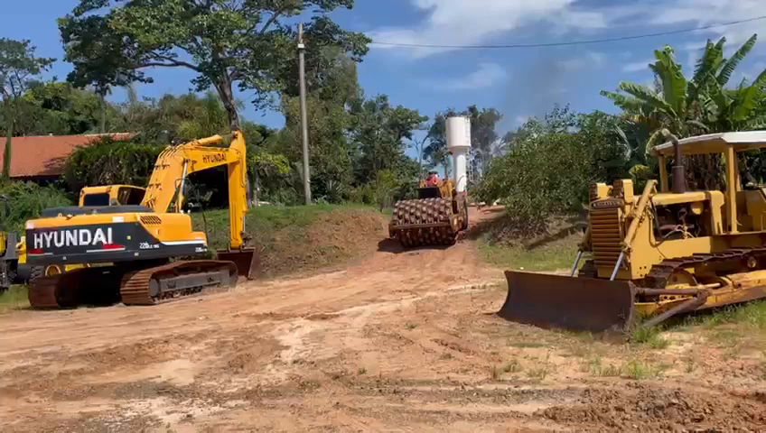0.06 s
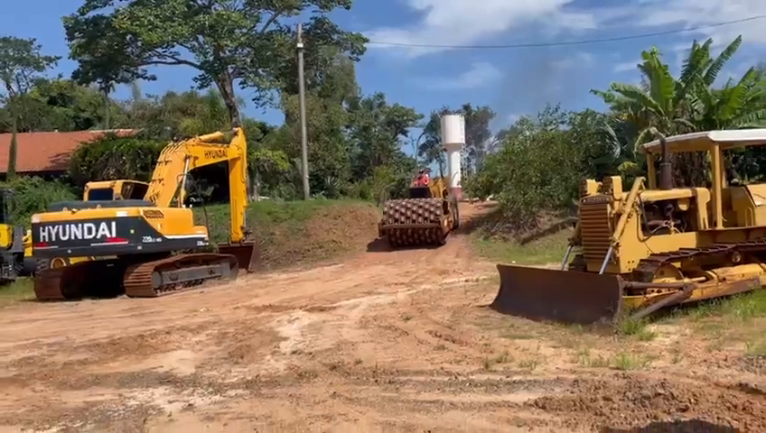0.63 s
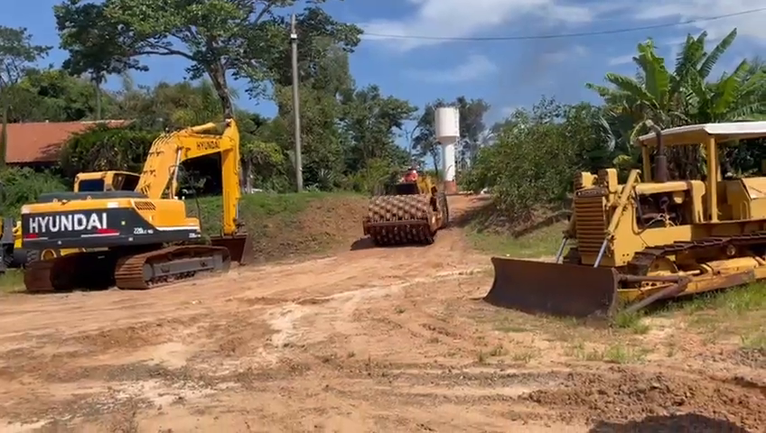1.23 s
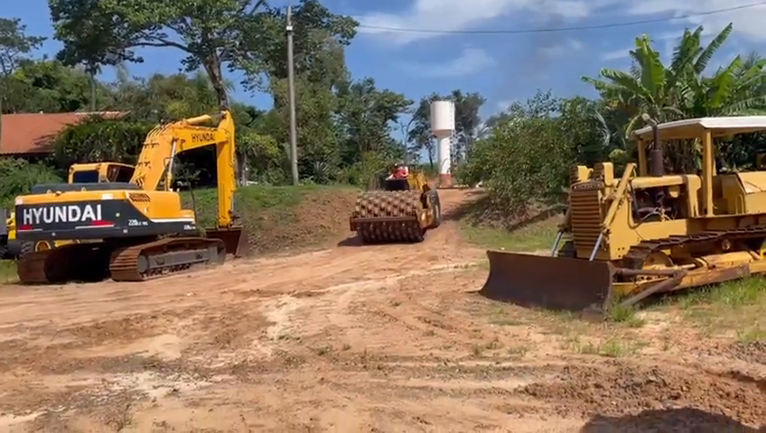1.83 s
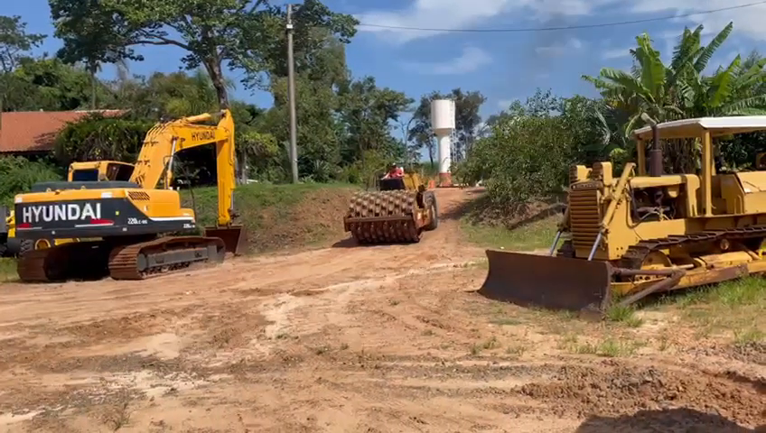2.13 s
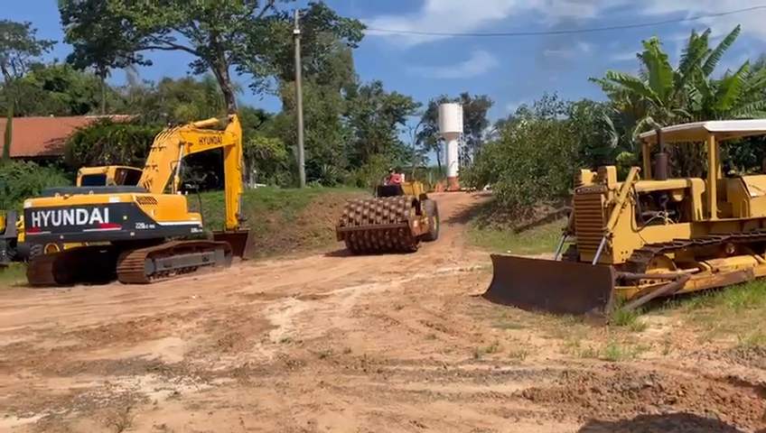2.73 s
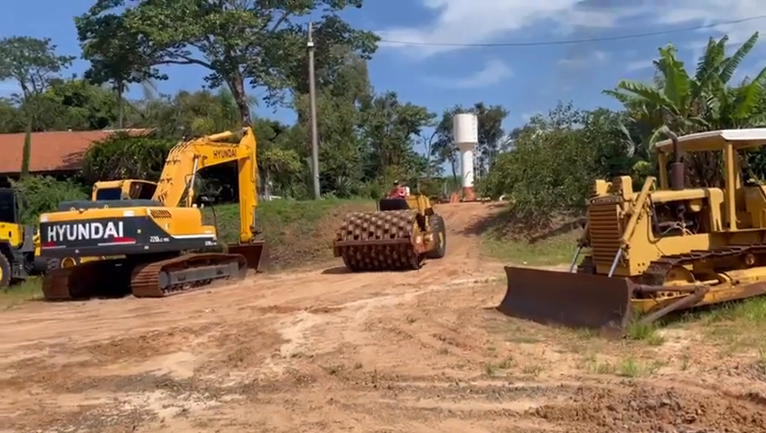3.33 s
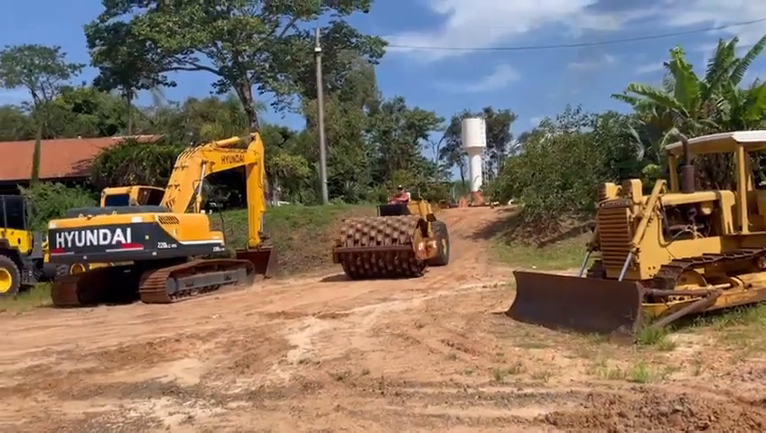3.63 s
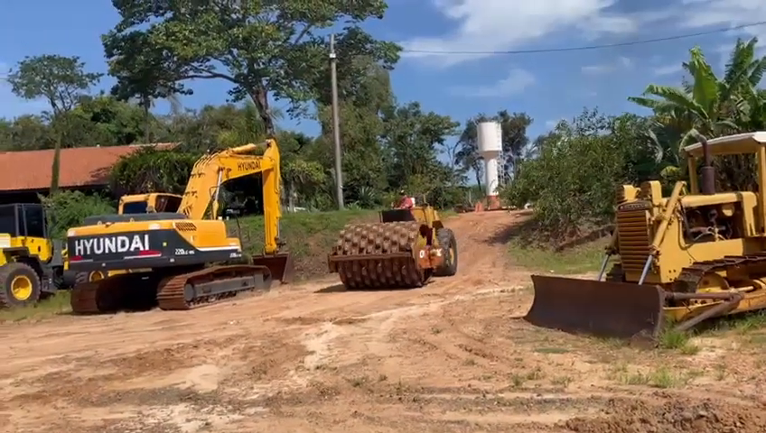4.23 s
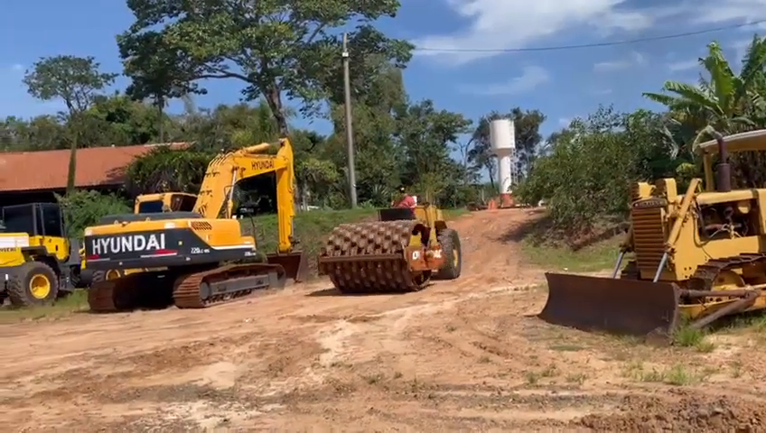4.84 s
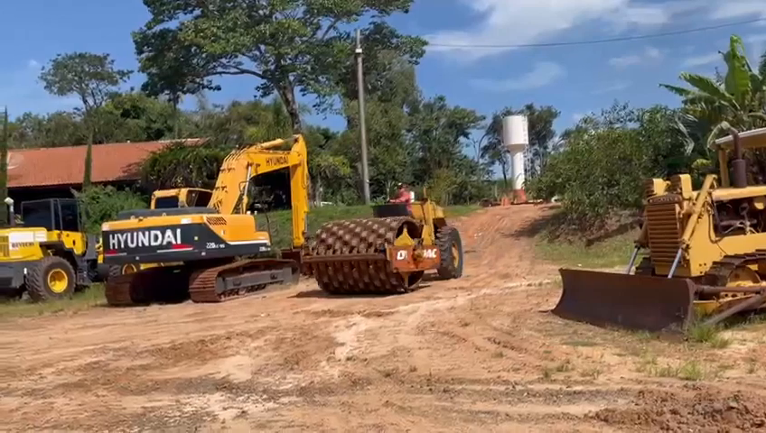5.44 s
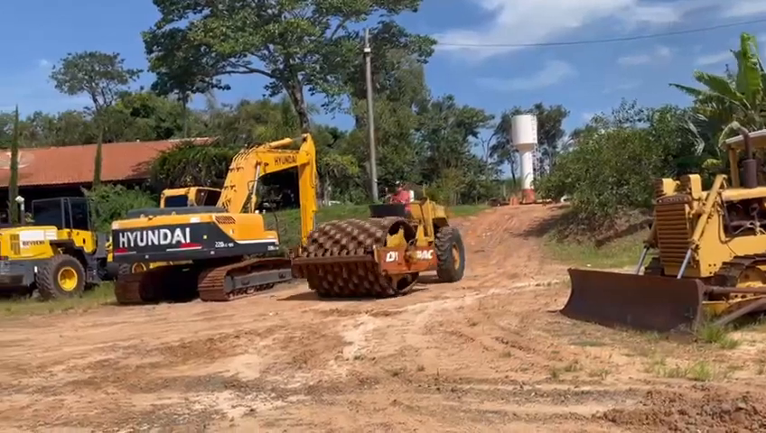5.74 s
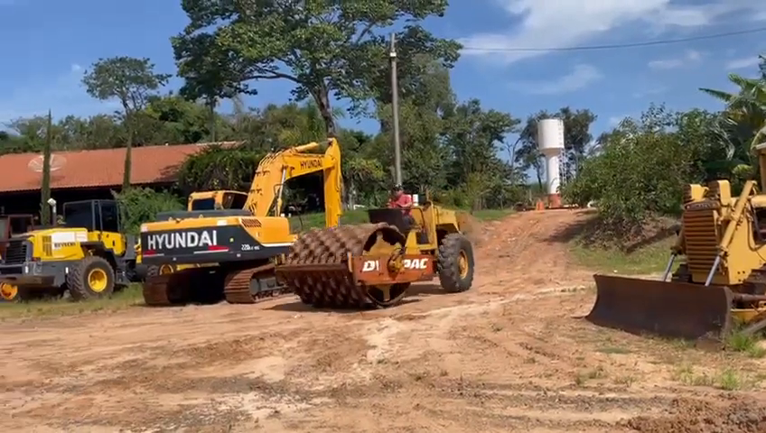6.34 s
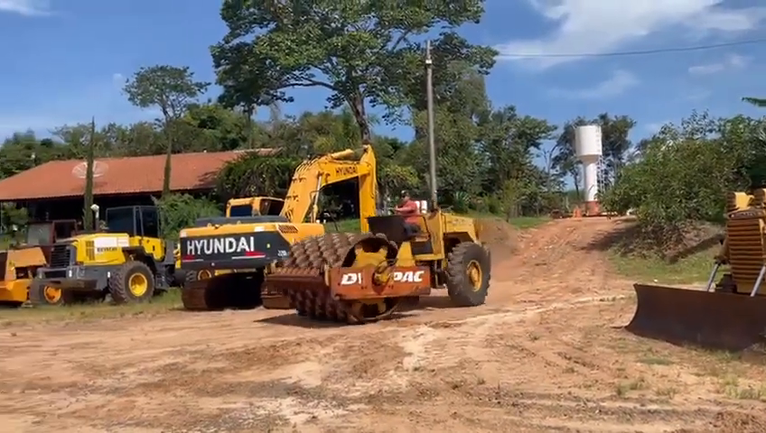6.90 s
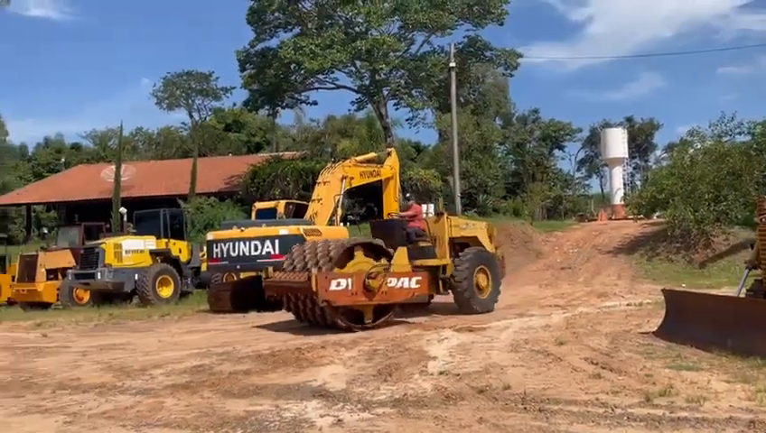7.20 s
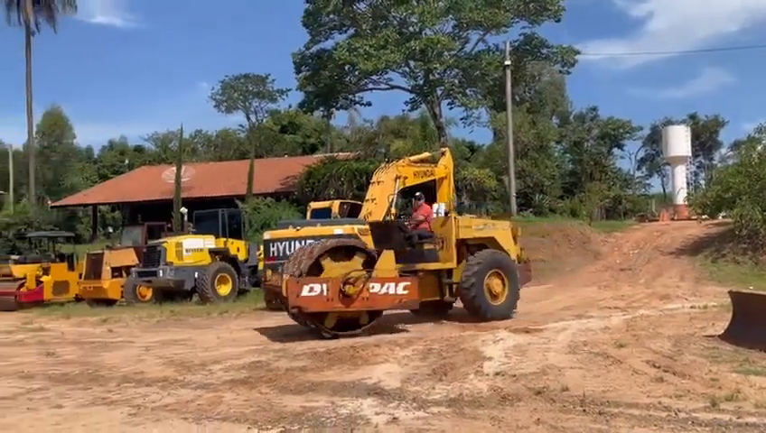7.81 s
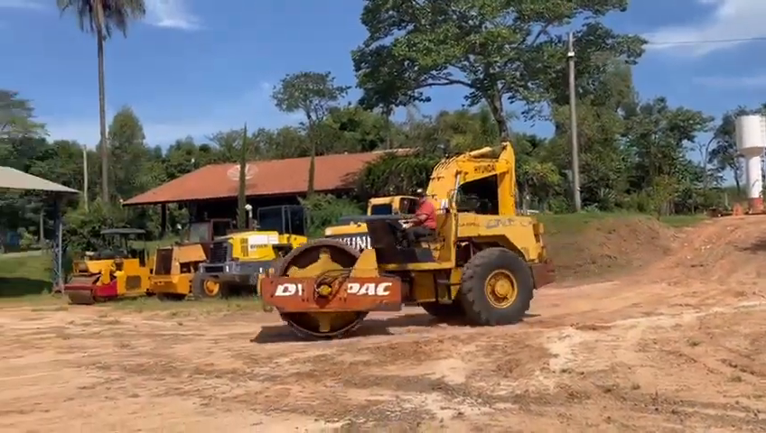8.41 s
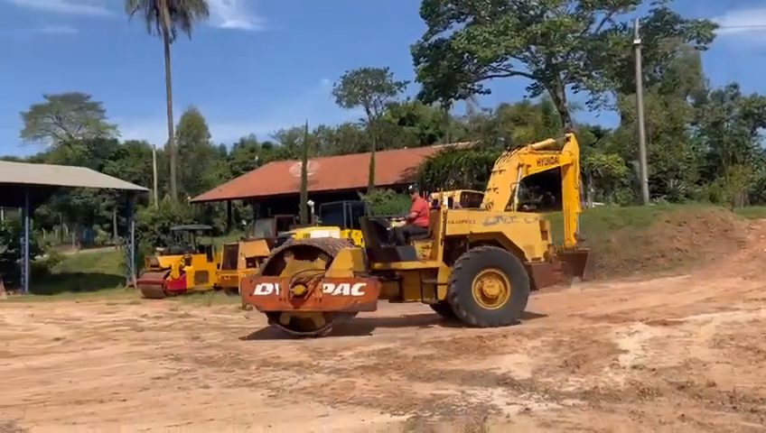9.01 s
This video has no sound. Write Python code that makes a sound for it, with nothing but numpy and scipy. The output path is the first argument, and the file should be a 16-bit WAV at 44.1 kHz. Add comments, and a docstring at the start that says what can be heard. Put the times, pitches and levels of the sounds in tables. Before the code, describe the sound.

The booming diesel engine of a road roller draws nearer outdoors, knocking and ticking while its drum rattles and groans.

```python
"""A six-cylinder diesel road roller, heard from a stereo microphone in an open yard, about 23 m off to 7 m.
It drives down a dirt ramp and across the yard. The exhaust booms at the firing rate and uneven cylinders
make it lope; the block knocks, and the injectors clatter and ring the covers. The padfoot drum crunches
over the crest and groans, its scraper plates rattle and loose steel clanks.
Parked machines and trees scatter the sound back from the sides."""
import sys
import numpy as np
from scipy import signal
from scipy.fft import rfft, irfft, next_fast_len
from scipy.io import wavfile
from scipy.ndimage import uniform_filter1d, map_coordinates

SR = 44100
rng = np.random.default_rng(int(sys.argv[2]) if len(sys.argv) > 2 else 0)


def int16_out(signal):
    """Quantize to a 16-bit WAV file."""
    q = np.round(np.clip(np.atleast_2d(signal).T, -1, 1) * 32767)
    wavfile.write(sys.argv[1], SR, q.astype(np.int16))


N = 399546
TIME = np.arange(N) / SR
CYLINDERS = 6

# exhaust note at the microphone: time_s, level_db
EXHAUST_LEVEL = [(0.0, -12), (0.05, -11), (0.91, -12), (2.85, -8.5), (3.5, -10), (4.14, -7.5), (4.97, -10),
                 (6.56, -7.5), (8.15, -8), (8.93, -12), (9.01, -11.5), (9.06, -12.5)]
# unevenness of the firings: time_s, depth_per_cycle, depth_per_crank_turn (both 0-1)
EXHAUST_LOPE = [(0, 0.13, 0.12), (1.1, 0.2, 0.13), (1.6, 0.04, 0.06), (7, 0, 0.02), (8.4, 0, 0.1),
                (9.06, 0.05, 0.55)]
def exhaust(firing, in_yard):
    """The pipe rounds the firing pulses to a deep note and its octave; uneven cylinders make it throb."""
    note_db, = curves(EXHAUST_LEVEL)
    per_cycle, per_turn = curves(EXHAUST_LOPE)
    cycle_angle = 2 * np.pi * firing / CYLINDERS
    lope = 1 + per_cycle * np.cos(cycle_angle) + per_turn * np.cos(2 * cycle_angle)
    angle = 2 * np.pi * firing + 0.012 * np.sin(2 * cycle_angle)  # the crank hurries and lags each turn
    note = undb(note_db + 0.15 * walk(12)) * np.cos(angle)
    # the octave is stronger side-on, in the yard; it swells and sinks every 1.06 s
    octave_db = blend((-33, -19.5), in_yard) - 1.1 * np.cos(2 * np.pi * (TIME - 6.87) / 1.06)
    octave = undb(octave_db + 0.37 * walk(9)) * np.cos(2 * angle + np.pi / 3 + 0.042 * walk(15))
    return np.sqrt(2) * lope * (note + octave)


# exhaust lines, relative to the rumble: multiple_of_cycle, ramp_db, yard_db
EXHAUST_LINES = [(3, -16, -32), (5, -12, -36), (7, -24, -20), (8, -14, -16.5), (9, -11, -15.5),
                 (10, -7.5, -10), (11, -19.5, -14.5), (14, -16, -11), (15, -25, -12.5), (16, -22.5, -17),
                 (18, -11.5, -14.5), (20, -26, -18), (21, -18.5, -18), (22, -21, -22), (24, -27.5, -16.5),
                 (26, -33, -22.5), (28, -34, -21), (31, -29, -27), (35, -34, -19.5), (36, -28, -25.5),
                 (39, -33.5, -25), (42, -35.5, -24)]
# lines of the belt-driven fan, likewise: multiple_of_cycle, ramp_db, yard_db
FAN_LINES = [(20.34, -19.5, -16.5), (36.65, -36, -25)]
# spectrum of the exhaust gas: frequency_hz, gain_db
GAS_SPECTRUM = [(20, -13.5), (36, -15.5), (50, -1.5), (75, -2.5), (100, -6.5), (150, -4), (200, -4.5),
                (260, -8.5), (330, -7), (420, -12.5), (600, -21.5), (1200, -52.5)]
def rumble(cycle, in_yard):
    """Exhaust and fan lines hum in turbulent gas; their balance shifts as the roller turns side-on."""
    lines = 0
    for order, *levels_db in EXHAUST_LINES + FAN_LINES:
        angle = 2 * np.pi * (order * cycle + rng.random()) + 0.31 * walk(6)
        lines += undb(blend(levels_db, in_yard)) * np.cos(angle)
    gas = unit(colour(rng.standard_normal(N), GAS_SPECTRUM))
    return np.sqrt(2) * lines + undb(-3.5) * gas


# the block heard far off, on the ramp: frequency_hz, gain_db
KNOCK_ON_RAMP = [(250, -28), (480, 0), (620, -1.5), (780, -2), (950, -2), (1200, -6), (1500, -4.5),
                 (1850, -11.5), (2080, -7), (2600, -13.5), (5000, -54.5)]
# the block heard closer, in the yard: frequency_hz, gain_db
KNOCK_IN_YARD = [(250, -8.5), (450, 0.5), (600, 1.5), (720, -1.5), (850, -3.5), (1050, -3), (1300, -2.5),
                 (1600, -4.5), (1900, -7), (2600, -15.5), (5000, -51)]
# its side panels: pitch_hz, width_hz, lift_db
PANEL_RESONANCES = [(597, 70, 4), (796, 60, 5), (908, 90, 6), (1180, 45, 6), (1313, 48, 4.5)]
def block_knock(firing, in_yard):
    """Combustion knocks the block; its side panels face the microphone once it is in the yard."""
    impacts = cycle_noise(firing, repeat=0.25)
    impacts *= blows(firing, [0, -2.5, 1.6, 2, -6, -0.5], decay_firings=0.82, scatter_db=1.7, floor=2)
    far = unit(colour(impacts, KNOCK_ON_RAMP))
    near = unit(colour(impacts, KNOCK_IN_YARD, PANEL_RESONANCES))
    return blend((far, near), in_yard)


# spectrum of the valve clatter: frequency_hz, gain_db
VALVE_SPECTRUM = [(1000, -17.5), (1700, 1), (1900, -3.5), (2100, 1.5), (2650, 1), (3100, 0.5), (3450, 1.5),
                  (4050, -1), (4500, -4), (6000, -15.5), (9000, -52.5)]
# the covers it passes through: pitch_hz, width_hz, lift_db
COVER_RESONANCES = [(2640, 280, 2.1), (3980, 210, 1.3)]
def valve_clatter(firing):
    """The valves rattle the covers, out of step with the firings."""
    cylinder_db = [2.5, -10, -8.5, -1, -1, -1.5]
    strikes = blows(firing + 5.19, cylinder_db, decay_firings=0.99, scatter_db=1.5, floor=0.56)
    clatter = cycle_noise(firing, repeat=0.33) * strikes * undb(0.5 * walk(14))
    return unit(colour(clatter, VALVE_SPECTRUM, COVER_RESONANCES))


# each cylinder's injector tick: relative_db
TICK_DB = [-1.5, 2.5, -1, -0.5, -5, -1.5]
# spectrum of the ticks: frequency_hz, gain_db
INJECTOR_SPECTRUM = [(2500, -23), (4000, 1.5), (4600, 2), (5400, 3.5), (6200, 0), (7000, 0), (8200, -2.5),
                     (9300, -3), (10000, -11.5), (11400, -9), (12500, -45)]
def injector_hiss(firing):
    """The injector ticks run together into a pulsing hiss; one cylinder is louder than the rest."""
    ticks = blows(firing, TICK_DB, decay_firings=1, scatter_db=1.8, floor=0.85)
    hiss = cycle_noise(firing, repeat=0.092) * ticks * undb(1.1 * walk(13))
    return unit(colour(hiss, INJECTOR_SPECTRUM))


# engine covers that face the yard: pitch_hz, relative_db
COVER_NOTES = [(1650, -5), (2350, -2), (3100, -5.5), (3550, -1.5), (4020, 3), (5350, -15), (5900, 1),
               (6450, -3), (7400, -2), (8600, -12), (10500, -13.5)]
def cover_ring(firing):
    """Each injection rings the sheet-metal covers, at a slightly different pitch and strength each time."""
    starts = np.flatnonzero(np.diff(np.floor(firing))) + 1
    tick_db = np.array(TICK_DB)[firing[starts].astype(int) % CYLINDERS]
    out = 0
    for hz, db in COVER_NOTES:
        stray, force, late = rng.standard_normal((len(starts), 3)).T
        starts_s = starts / SR + 0.002 * abs(late)
        out += pings(starts_s, hz * (1 + 0.0407 * stray), db + tick_db + 5.5 * np.tanh(force), t60_s=0.064)
    return unit(out)


# scraper plates: pitch_hz, relative_db on the ramp, relative_db from its foot on
PLATE_NOTES = [(1797, -12.5, -7.5), (2077, -2.5, -7.5), (2192, -1, -9), (2283, -10.5, 1), (2457, -13.5, -1),
               (2890, 0.5, -2), (3045, -3.5, 2), (3150, -6.5, -7), (3306, -5, -2.5), (3464, -6.5, -2.5),
               (3766, -2, -4), (4980, -4.5, -10)]
# their rattle at the microphone: time_s, level_db
PLATE_LEVEL = [(0, -54), (2.0, -42.5), (2.7, -35), (3.75, -33), (4.1, -29), (4.75, -29.5), (5.4, -35.5),
               (6.3, -36.5), (7.3, -34), (8.3, -34.5), (8.75, -31), (9.06, -32.5)]
def plate_rattle(strikes_per_s=54):
    """Scraper plates clink against the drum; different ones stand out from the foot of the ramp on."""
    level_db, = curves(PLATE_LEVEL)
    past_foot = passage(middle_s=3.9, length_s=0.33)
    count = int(strikes_per_s * N / SR)
    out = 0
    for hz, *levels_db in PLATE_NOTES:
        moment, force = rng.random((count, 2)).T
        starts_s = (np.arange(count) + moment) / strikes_per_s
        pitch_hz = hz * (1 + 0.0055 * rng.standard_normal(count))
        strikes = pings(starts_s, pitch_hz, db=11 * force, t60_s=0.075)
        out += undb(blend(levels_db, past_foot)) * unit(strikes)
    return undb(level_db) * unit(out)


# modes of the loose steel: pitch_hz, relative_db, t60_s
STEEL_MODES = [(2370, -6.5, 0.081), (3680, -6.5, .07), (3996, -7.5, 0.074), (4290, -10, 0.04),
               (5070, -6, 0.041), (5370, -11.5, 0.054), (5850, -13, 0.07), (6940, -3.5, 0.027)]
def steel_clink(t, favoured_hz, lift_db=12, width_hz=190):
    """One blow on loose steel: a crack and a ring, lifted near the pitch that the struck spot favours."""
    modes = [(hz, db + lift_db * np.exp(-((hz - favoured_hz) / width_hz) ** 2), t60_s)
             for hz, db, t60_s in STEEL_MODES]
    crack = signal.lfilter(*signal.butter(2, 7000, fs=SR), rng.standard_normal(len(t)))
    crack *= np.exp(-t / 0.011) + 0.36 * np.exp(-t / 0.082)
    attack = 1 - np.exp(-t / 0.00038)
    return attack * (undb(-4) * ring(modes, t, detune=0.0094) + undb(-2) * crack)


# modes of the drum's shell: pitch_hz, relative_db, t60_s
SHELL_MODES = [(511, 4.5, 0.25), (620, -7, 0.2), (790, -3, 0.25)]
# blows on the drum: start_s, steel_gain_db, shell_gain_db, favoured_hz
STEEL_BLOWS = [(0.054, -34.5, -54, 3910), (0.168, -32.5, -58, 3600), (0.256, -33, -55, 3790),
               (0.326, -28.5, -54, 3880), (0.422, -30, -55, 4300), (0.534, -35, -55, 4900),
               (1.057, -31.5, -35, 5370), (1.332, -31, -40, 4120), (1.449, -17, -27.5, 3920),
               (1.470, -27.5, -27.5, 2400), (1.493, -35, -28.5, 3700), (1.819, -30, -55, 3400),
               (2.853, -24.5, -38, 5300), (3.22, -24, -37, 5070), (3.278, -21, -33, 3680),
               (3.340, -18.5, -36, 5330), (3.373, -24.5, -50, 3780), (3.64, -38, -45, 3000),
               (4.308, -22, -48, 3800)]
def steel_clanks(firing):
    """Loose steel strikes the drum and rings its shell; on the ramp the engine shakes it into taps."""
    out = np.zeros(N + SR)
    t = np.arange(SR // 2) / SR
    for start_s, steel_db, shell_db, favoured_hz in STEEL_BLOWS:
        start = int(start_s * SR)
        steel = undb(steel_db) * steel_clink(t, favoured_hz)
        shell = undb(shell_db) * ring(SHELL_MODES, t, detune=0.0027)
        out[start:start + len(t)] += steel + shell
    tap_t = t[:SR // 8]
    for start in np.flatnonzero(np.diff((firing - 0.7) // CYLINDERS)):  # once an engine cycle
        if 2.75 < start / SR < 4.1:
            strength = undb(-28 + 1.2 * rng.standard_normal())
            out[start:start + len(tap_t)] += strength * steel_clink(tap_t, favoured_hz=6780)
    return out[:N]


# grit crushed under the drum: frequency_hz, gain_db
GRIT_SPECTRUM = [(200, -11), (500, 12), (900, -4), (2000, -6), (4000, -7.5), (6300, -2.5), (7500, -5),
                 (12000, -25)]
def grit_crunch(start_s=2.26, attack_s=0.055, fade_after_s=0.15, release_s=0.11, grains_per_s=6200):
    """The drum bites into grit as it tips over the crest: a surge of tiny impacts that dies away."""
    age = TIME - start_s
    swell = np.clip(age / attack_s, 0, 1) * np.exp(-np.maximum(age - fade_after_s, 0) / release_s)
    level_db = -29.5 + 2.1 * walk(60)
    grains = (rng.random(N) < grains_per_s / SR) * np.sign(rng.standard_normal(N))
    grains *= undb(12 * rng.random(N))
    return swell * undb(level_db) * unit(colour(grains, GRIT_SPECTRUM))


# groans of the turning drum: start_s, length_s, pitch_hz, level_db
DRUM_GROANS = [(0, .5, 790, -36), (0, 1.2, 284.4, -34), (0.503, 1.1, 682, -37), (2.643, 0.51, 512, -33),
               (3.049, 0.5, 358.4, -30.5), (3.42, .6, 480, -33), (0.554, 0.55, 2066, -42),
               (6.295, 0.83, 1309, -30.5), (6.602, 0.68, 331, -26), (6.702, 0.52, 1700, -31.5),
               (7.05, 0.82, 623, -32), (7.598, 0.77, 1330, -39), (8.046, 0.28, 1190, -32),
               (8.65, .4, 1190, -32.5)]
def drum_groans(sag_per_s=0.035, edge_s=0.058, cycles_per_slip=12):
    """The drum rubs and slips as it turns, sounding short, hoarse notes that sag in pitch."""
    out = 0
    for start_s, length_s, pitch_hz, db in DRUM_GROANS:
        age = TIME - start_s
        angle = 2 * np.pi * np.cumsum(pitch_hz * (1 - sag_per_s * age)) / SR
        swell = np.clip(np.minimum(age, length_s - age) / edge_s, 0, 1)
        slip_hz = pitch_hz / cycles_per_slip
        hoarse = (walk(slip_hz) * np.sin(angle) + walk(slip_hz) * np.cos(angle)) / np.sqrt(2)
        out += swell * undb(db) * hoarse
    return out


# jolts over the ground: peak_s, half_length_s, knock_lift_db, clatter_lift_db, hiss_lift_db
JOLTS = [(2.423, 0.33, 1.5, 6.5, 9), (3.1, 0.34, -1, 2, 3), (4.086, 0.22, 0, 0.5, 2.5),
         (4.71, 0.39, 0, 5, 7.5), (6.85, 0.4, 1.5, 1, 1.5), (7.453, 0.24, 1.5, 1, 2),
         (7.922, 0.095, 2.5, 1, 2), (8.75, 0.18, 0, 3, 0.5)]
def jolts():
    """Each jolt swells the rattling in a bell curve; gives the dB added to knock, clatter and hiss."""
    return sum(np.outer(lifts_db, np.exp(-((TIME - peak_s) / half_s) ** 2))
               for peak_s, half_s, *lifts_db in JOLTS)


def close_reflection(x, in_yard):
    """A close reflection faintly combs the sound; the comb shifts as the roller enters the yard."""
    lag_ms = blend((1.5, 1.1), in_yard)
    strength = blend((0.038, 0.028), in_yard)
    late = map_coordinates(x, [np.arange(N) - lag_ms * SR / 1000], order=3)
    return (x + strength * late) / np.sqrt(1 + strength ** 2)


# sound scattered around the yard: frequency_hz, gain_db
ECHO_SPECTRUM = [(40, -21), (100, -42), (300, -23.5), (600, -17), (1200, -10), (1700, -5.5), (2500, -11),
                 (3800, -19.5), (5000, -18), (7000, -10), (8000, -46), (12000, -28)]
def yard_echoes(x, t60_s=0.32, gap_s=0.006):
    """Echoes from parked machines and trees reach the microphone from the sides; gives left and right."""
    t = np.arange(SR // 3) / SR
    echoes = rng.standard_normal(len(t)) * undb(-60 * t / t60_s) * (t > gap_s)
    scattered = signal.fftconvolve(x, echoes / np.linalg.norm(echoes))[:N]
    side = colour(scattered, ECHO_SPECTRUM)
    return np.array([x + side, x - side])


def cycle_noise(firing, repeat):
    """Dense impacts; the share `repeat` falls at the same crank angles in every engine cycle."""
    cycle = firing / CYLINDERS
    size = int(N / cycle[-1])
    pattern = rng.standard_normal(size)
    locked = pattern[(cycle * size).astype(int) % size]
    return np.sqrt(repeat) * locked + np.sqrt(1 - repeat) * rng.standard_normal(N)


def blows(firing, cylinder_db, decay_firings, scatter_db, floor):
    """Envelope of one blow per firing; each cylinder has its own strength."""
    index = np.floor(firing).astype(int)
    stray_db = scatter_db * rng.standard_normal(index.max() + 2)[index]
    strength = undb(np.array(cylinder_db)[index % CYLINDERS] + stray_db)
    decays = strength * np.exp(-(firing % 1) / decay_firings)
    return unit(floor + uniform_filter1d(decays, size=220))  # 5 ms to spread through the metal


def ring(modes, t, detune):
    """Decaying modes; each blow lands elsewhere and shifts their strength and pitch a little."""
    chance = rng.standard_normal((len(modes), 2))
    return sum(undb(db + 2 * force - 60 * t / t60_s) * np.sin(2 * np.pi * hz * (1 + detune * stray) * t)
               for (hz, db, t60_s), (force, stray) in zip(modes, chance))


def pings(starts_s, hz, db, t60_s):
    """Many small strikes, each ringing briefly at its own pitch and strength."""
    t = np.arange(SR // 18) / SR
    fade = (1 - np.exp(-t / 0.0006)) * undb(-60 * t / t60_s)
    waves = np.outer(undb(db), fade) * np.sin(np.outer(2 * np.pi * hz, t))
    places = (starts_s * SR).astype(int)[:, None] + np.arange(len(t))
    return np.bincount(places.ravel(), waves.ravel(), N)[:N]


def colour(x, spectrum, resonances=()):
    """Pass a sound through a broad spectrum with resonances on top."""
    size = next_fast_len(N)
    freqs = np.arange(size // 2 + 1) * SR / size
    peaks_db = sum(lift / (1 + (2 * (freqs - hz) / width) ** 2) for hz, width, lift in resonances)
    return irfft(rfft(x, size) * undb(along(spectrum, freqs) + peaks_db), size)[:N]


def walk(rate_hz):
    """Glide between random values, rate_hz of them a second; rms 1."""
    hold = max(int(SR / rate_hz), 1)
    steps = np.repeat(rng.standard_normal(N // hold + 1), hold)
    return unit(uniform_filter1d(steps, hold)[:N])


def curves(table):
    """The columns of a table, joined by straight lines in time."""
    times_s, *columns = np.transpose(table)
    return [np.interp(TIME, times_s, column) for column in columns]


def along(points, freqs):
    """Read (frequency_hz, value) points on a log-frequency axis."""
    hz, value = np.transpose(points)
    return np.interp(np.log(freqs + 1), np.log(hz), value)


def passage(middle_s, length_s):
    """A steady change from 0 to 1 around a moment."""
    return np.clip(0.5 + (TIME - middle_s) / length_s, 0, 1)


def blend(pair, share):
    """Go from the first value of a pair to the second."""
    return pair[0] + (pair[1] - pair[0]) * share


def undb(db):
    """Decibels to gain."""
    return 10 ** (np.asarray(db) / 20)


def unit(x):
    """Scale to rms 1."""
    return x / np.sqrt(np.mean(x ** 2))


TRAVEL_M_S, NEAREST_M, NEAREST_S = 2.72, 7.12, 8.16  # a straight line past the microphone
# engine speed, sagging at the crest and settling lower in the yard: time_s, firing_hz
ENGINE_SPEED = [(0, 100.3), (1.1, 100.5), (1.8, 99.26), (2.25, 94.97), (2.55, 96.87), (2.92, 98.8),
                (3.42, 99.18), (3.8, 97.59), (4.3, 97.62), (4.55, 96.78), (5.7, 96.85), (6.35, 95.72),
                (7.4, 95.92), (9.06, 96.36)]
def scene():
    """The roller nears the microphone; one crankshaft times the engine and the drum adds its rattles."""
    firing_hz, = curves(ENGINE_SPEED)
    firing = np.cumsum(firing_hz) / SR + 1 / 4  # running count of firings
    distance_m = np.hypot(TRAVEL_M_S * (TIME - NEAREST_S), NEAREST_M)
    distance_db = -20 * np.log10(distance_m / NEAREST_M)
    behind_crest = 1 - passage(middle_s=2.2, length_s=1)  # the top of the ramp shades the treble
    in_yard = passage(middle_s=4.97, length_s=1)  # the roller turns side-on
    pipe = exhaust(firing, in_yard)
    pipe += undb(-20.5 + 0.33 * distance_db) * rumble(firing / CYLINDERS, in_yard)
    knock_lift_db, clatter_lift_db, hiss_lift_db = jolts()
    knock = undb(-25 + knock_lift_db) * block_knock(firing, in_yard)
    clatter = undb(-30 + clatter_lift_db - 3.5 * behind_crest) * valve_clatter(firing)
    screen_db = -6 * behind_crest - in_yard  # side-on, the covers screen the injectors by 1 dB
    hiss = undb(-31.5 + hiss_lift_db + screen_db) * injector_hiss(firing)
    covers = in_yard * undb(-30.5 + hiss_lift_db) * cover_ring(firing)
    engine = undb(distance_db) * (knock + clatter + hiss + covers)
    body = close_reflection(engine + plate_rattle(), in_yard)
    return yard_echoes(pipe + body + steel_clanks(firing) + grit_crunch() + drum_groans())


# lean of the stereo image: frequency_hz, left_minus_right_db
STEREO_BALANCE = [(60, 1.5), (400, 1.03), (630, 1.5), (1200, 6), (1800, 4), (2300, 4), (3700, 2.5),
                  (5000, 5), (6200, -0.46), (12000, 1)]
# left and right are in opposite phase from about 7.6 to 9.4 kHz: frequency_hz, left_lead_rad
STEREO_PHASE = [(20, 0), (6200, 0), (6850, -.6), (7600, -3.14), (9400, -3.14), (9750, -5), (10100, -6.28),
                (13000, -6.28)]
def record(dry, top_hz=11750):
    """The image leans left and the top treble sounds wide; peaks are rounded, then all above top_hz is cut."""
    size = next_fast_len(N)
    freqs = np.arange(size // 2 + 1) * SR / size
    left = undb(along(STEREO_BALANCE, freqs) / 2)
    right = np.exp(-1j * along(STEREO_PHASE, freqs)) / left
    heard = irfft(rfft(dry, size) * np.array([left, right]), size)[:, :N]
    rounded = heard / (1 + heard ** 12) ** (1 / 12)
    return signal.sosfilt(signal.ellip(10, 0.1, 80, top_hz, fs=SR, output="sos"), rounded)


dry = scene()
out = record(dry)
int16_out(out)
```